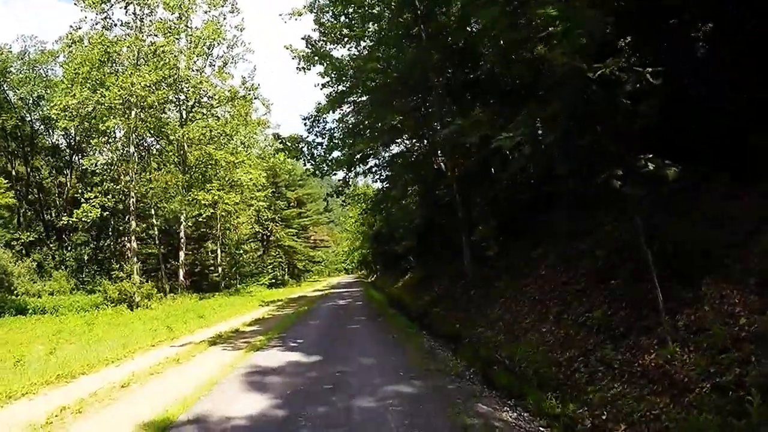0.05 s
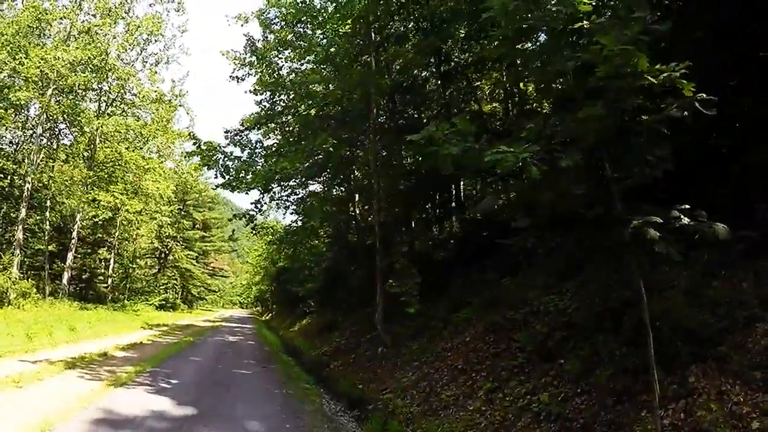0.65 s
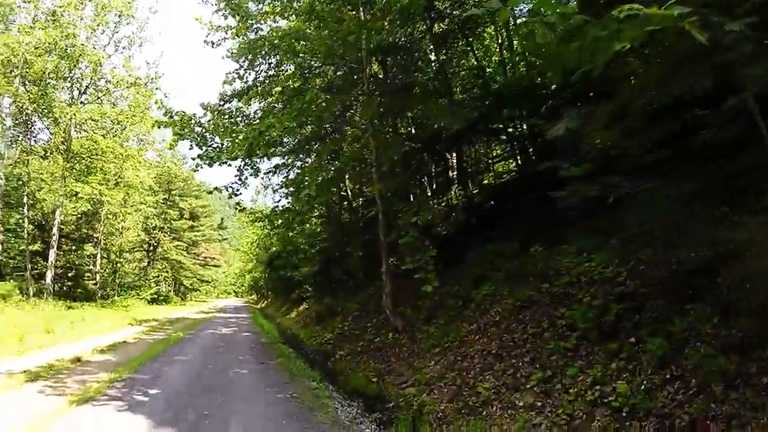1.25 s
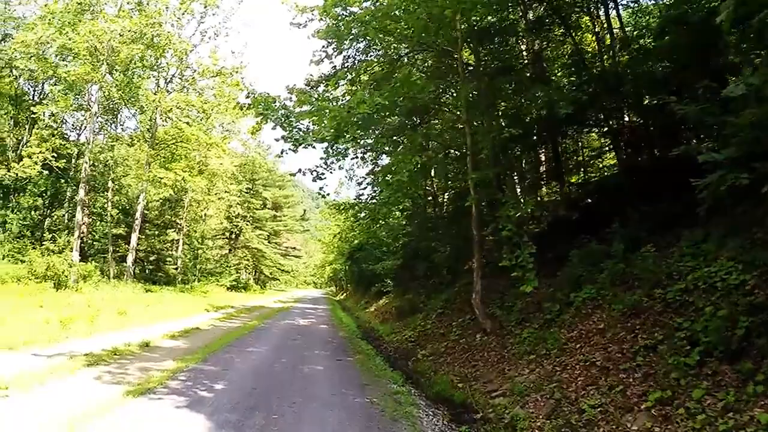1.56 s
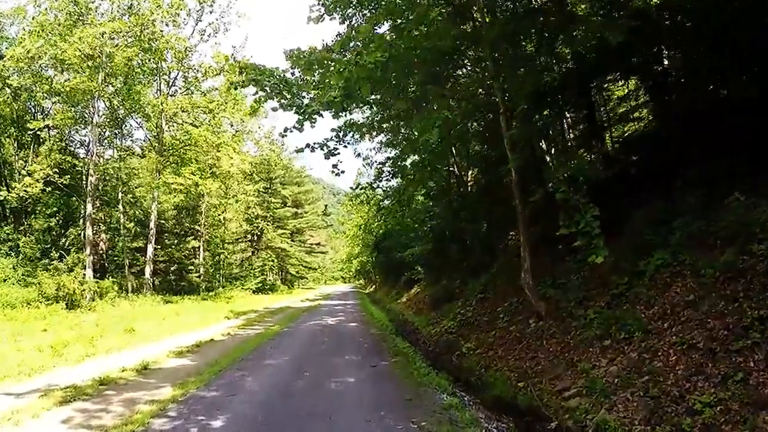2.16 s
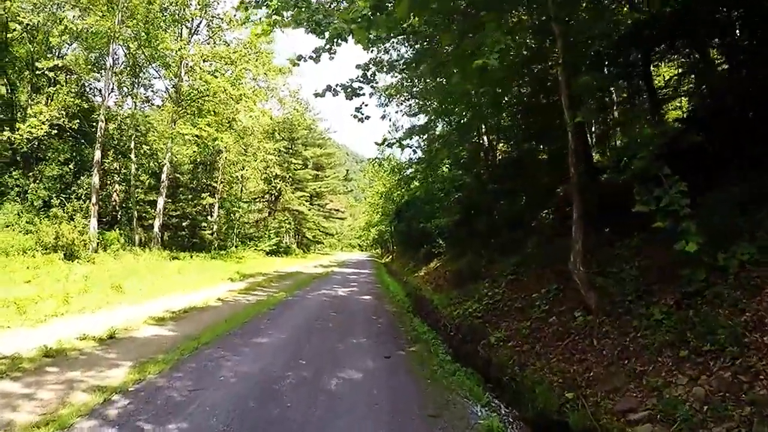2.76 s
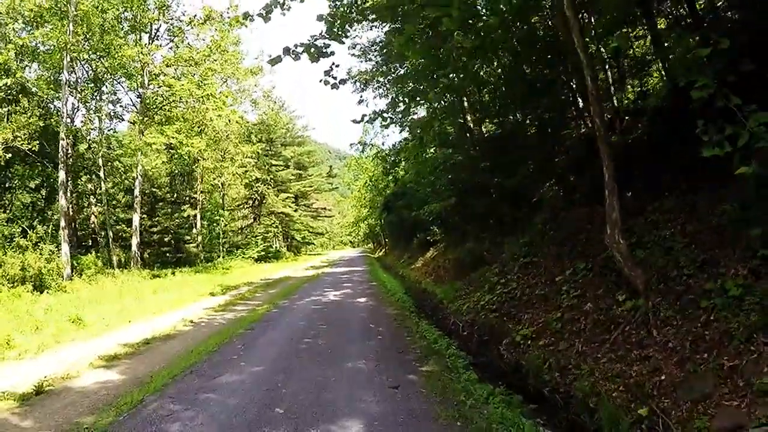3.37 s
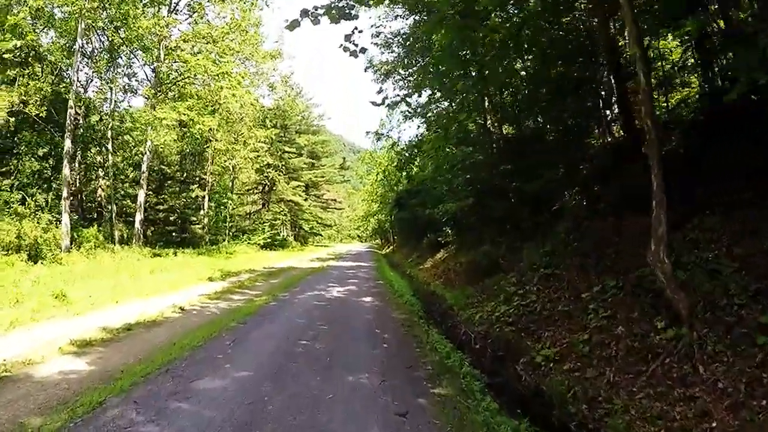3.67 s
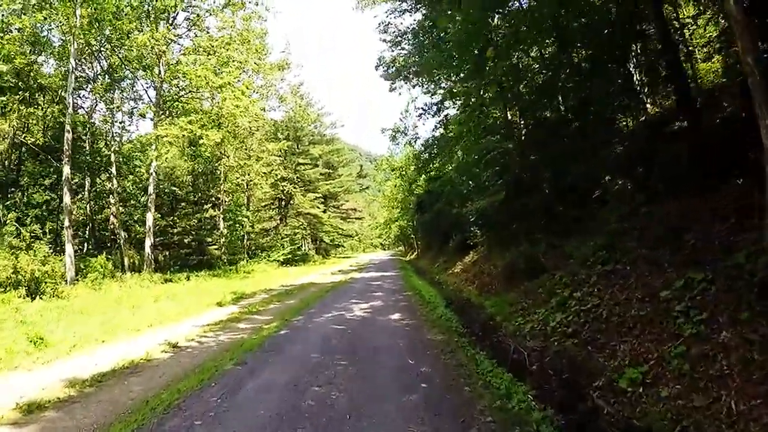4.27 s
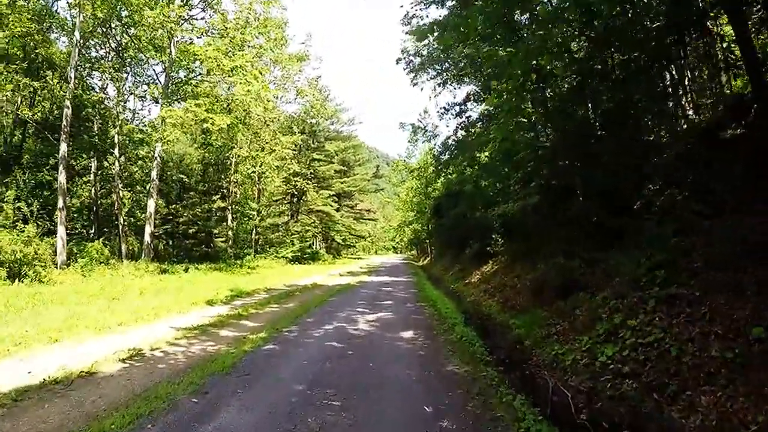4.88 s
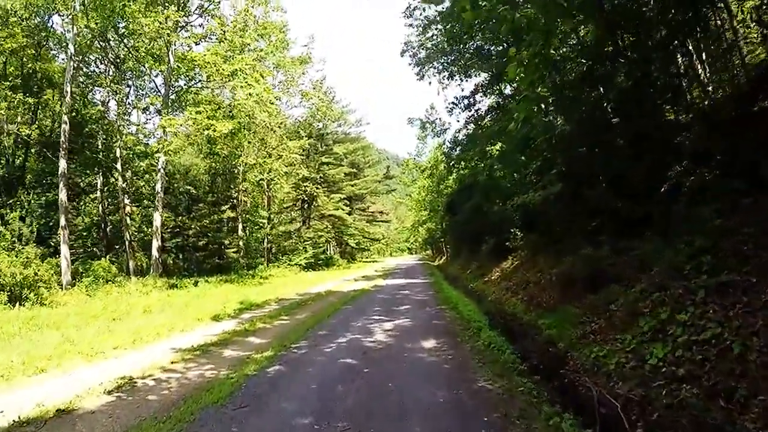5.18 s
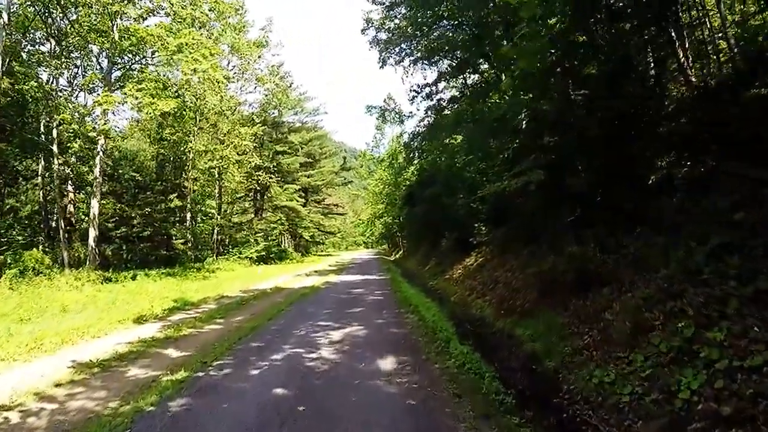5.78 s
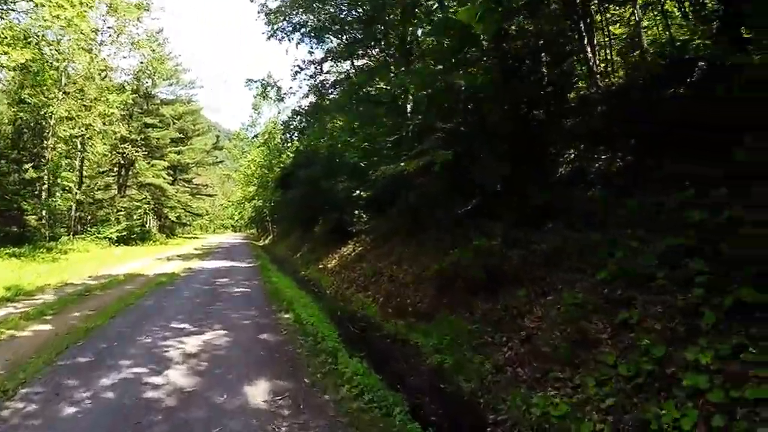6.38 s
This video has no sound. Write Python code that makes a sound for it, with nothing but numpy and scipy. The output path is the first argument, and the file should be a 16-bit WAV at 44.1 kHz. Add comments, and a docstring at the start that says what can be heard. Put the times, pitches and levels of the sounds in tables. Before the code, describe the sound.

Bicycle tyres crackle steadily over fine gravel, with sharp ticks of flicked stones and wind rumbling on the microphone.

```python
"""A bicycle rolls steadily along a fine gravel trail, heard from a camera in a plastic housing.
From the start the tyres crush grit into a crackle, the frame hums and the camera whines faintly.
Flicked stones ring the housing briefly, loudest at 0.6, 2.7 and 3.2 s, between gusts on the microphone.
Loosened gravel rattles now and then, most at 4.7 s. The strongest gusts follow at 5.1-5.5 s."""
import sys
import numpy as np
from scipy import signal
from scipy.fft import rfft, irfft, next_fast_len
from scipy.io import wavfile
from scipy.ndimage import uniform_filter1d, map_coordinates

SR = 44100
rng = np.random.default_rng(int(sys.argv[2]) if len(sys.argv) > 2 else 0)


def to_wav(sig):
    """Store sig (one row per channel, or 1-D mono) as 16-bit WAV at the path in sys.argv[1].

    Samples outside -1..1 are clipped; the rate is SR.
    """
    pcm = np.clip(np.atleast_2d(sig), -1, 1) * 32767
    pcm = np.round(pcm).astype(np.int16)
    wavfile.write(sys.argv[1], SR, pcm.T)  # frames by channels


N = 283563

# Table levels are relative; each source adds its own trim.
# tyre crunch: time_s, level_db
CRUNCH_LEVEL = [(0.0, -49), (0.66, -46.5), (1.2, -50), (1.83, -45), (2.29, -49.5), (2.52, -48),
                (4.48, -48.5), (4.96, -47), (5.77, -48), (6.43, -48)]
# grit, finest grains, rolling noise, plastic housing: freq_hz, gain_db
GRIT_SPECTRUM = [(300, -13.5), (800, -4), (1500, -11.5), (2000, -11), (2350, -5), (2650, 0), (3100, -3.5),
                 (3400, -9.5), (3920, -11), (4170, -6.5), (4450, -13.5), (5600, -7.5), (6800, -18.5),
                 (9000, -33.5)]
SAND_SPECTRUM = [(1000, -36), (3500, 5), (4200, -9.5), (4600, 3), (5100, 1.5), (6200, -8), (7500, -7.5),
                 (9000, -8), (14000, -29)]
ROLL_SPECTRUM = [(120, 13.5), (280, -10), (600, 3), (780, -9), (1050, -0.5), (1450, -17.5), (2200, -32),
                 (5000, -64)]
HOUSING_SPECTRUM = [(100, -33.5), (380, -9), (560, -0.5), (820, -2), (1200, -3), (1600, -8.5), (2100, -6.5),
                    (2600, 2.5), (3150, -1), (3800, -8), (4300, -1.5), (5700, -1.5), (7000, -8),
                    (9000, -23), (11500, -23), (15000, -39)]
# bicycle resonances: centre_hz, width_hz, gain_db
FRAME_MODES = [(378.8, 5.6, 4.5), (525.3, 13.3, 1), (669, 71, -3), (825, 18, -9)]
# loudest flicked stones: start_s, level_db, pitch_hz
LOUD_STONES = [(.194, -27, 1770), (.222, -24, 3140), (.597, -17.5, 3780), (1.211, -24, 3950),
               (1.3865, -31, 1270), (1.605, -27.5, 3000), (1.613, -22.5, 2920), (1.861, -28.5, 3050),
               (2.135, -29, 2340), (2.476, -23, 2000), (2.636, -27, 2080), (2.6955, -26.5, 1750),
               (2.7225, -18, 3600), (2.947, -30, 2390), (3.099, -29, 2940), (3.1764, -14, 2700),
               (3.180, -17, 1870), (3.239, -26, 3440), (3.2984, -26, 3830), (3.347, -28, 3200),
               (3.9377, -20.5, 2100), (4.551, -26.5, 3740), (4.734, -22.5, 2420), (4.7404, -25, 1250),
               (4.886, -26.5, 1000), (5.014, -30, 2910), (5.286, -26, 2950), (5.435, -24, 3300),
               (5.8646, -27.5, 3020), (5.998, -30.5, 1030), (6.302, -25, 2980), (6.416, -26, 4100)]
# loosened gravel: start_s, level_db, pitch_hz, t60_s
RATTLES = [(.664, -37, 2520, .039), (1.606, -43, 2710, 0.14), (1.915, -45, 3000, 0.21),
           (2.671, -41, 1780, 0.34), (3.425, -37, 900, 0.12), (3.644, -36.5, 1070, .06),
           (4.736, -32, 670, 0.12), (4.745, -38.5, 2700, 0.2), (4.967, -39.5, 2500, 0.17)]
# large and small wind eddies: time_s, level_db
BUFFET_LEVEL = [(0.0, -29.5), (0.83, -31), (0.85, -35.5), (1.25, -30), (1.32, -21.5), (1.55, -36.5),
                (2.1, -21), (2.21, -31), (2.24, -24.5), (2.76, -33.5), (3.16, -23), (3.21, -28.5),
                (3.87, -33), (4.28, -22.5), (4.64, -29.5), (5.02, -29), (5.14, -18), (5.32, -17),
                (5.44, -26), (5.49, -15.5), (5.61, -23), (5.89, -23.5), (5.91, -27.5), (6.24, -28.5)]
FLUTTER_LEVEL = [(0.0, -42), (0.11, -47), (0.48, -38.5), (1.79, -46), (1.88, -43.5), (3.49, -46),
                 (3.74, -37), (3.89, -47), (4.21, -44.5), (4.91, -48), (5.1, -35), (5.12, -44),
                 (5.28, -32.5), (5.35, -43.5), (5.55, -39.5), (5.62, -44.5), (6.3, -41.5), (6.43, -31)]
# large and small wind eddies: freq_hz, gain_db
BUFFET_SPECTRUM = [(10, -28), (22, -5.5), (35, -0.5), (65, -5), (100, -12), (150, -23.5), (300, -39.5),
                   (700, -117)]
FLUTTER_SPECTRUM = [(50, -24), (100, -4.5), (150, -1), (230, -6), (370, -11), (600, -17), (1500, -53)]

STONE_HZ = 3040  # typical pitch


def tyres():
    """Grit hisses, gravel crackles, rolling shakes the bicycle; loose patches stir gravel most."""
    crunch_db = envelope(CRUNCH_LEVEL)
    patch_db = 0.7 * wobble(20)
    grit = grains(GRIT_SPECTRUM, count=24000, pitch_hz=4460, log_spread=0.48, scatter_db=1.5, cycles=0.3)
    gravel = grains(HOUSING_SPECTRUM, count=1800, pitch_hz=2940, log_spread=0.54, scatter_db=8,
                    cycles=0.84)
    sand = grains(SAND_SPECTRUM, count=1800, pitch_hz=5040, log_spread=0.24, scatter_db=0.5, cycles=2)
    crunch = amp(-0.3 + patch_db) * grit + amp(-5 + 4.6 * patch_db) * gravel
    crunch += amp(-12 + 2.8 * wobble(35)) * sand
    roll_db = -46.6 + 0.23 * (crunch_db - crunch_db.mean())
    rolling = amp(-4) * frame_hum()
    rolling += amp(1.66 + patch_db + 2.2 * wobble(14)) * noise(ROLL_SPECTRUM)
    return amp(crunch_db) * crunch + amp(roll_db) * rolling


def grains(spectrum, count, pitch_hz, log_spread, scatter_db, cycles):
    """Contacts of random time, pitch and size ring a body with this spectrum; rms 1."""
    starts = rng.integers(0, N, count)
    pitch_draw, size_draw = rng.standard_normal((2, count))
    snaps = snap(np.minimum(pitch_hz * np.exp(log_spread * pitch_draw), SR / 4), cycles)
    snaps /= np.linalg.norm(snaps, axis=1, keepdims=True)
    sizes = amp(scatter_db * np.minimum(size_draw, 2.2)) * rng.choice([-1, 1], count)
    indices = starts[:, None] + np.arange(snaps.shape[1])
    contacts = np.bincount(indices.ravel(), (snaps * sizes[:, None]).ravel(), N)[:N]
    return unit(signal.fftconvolve(contacts, impulse_response(spectrum))[:N])


def stones():
    """Each stone snaps, scrapes and rebounds, ringing the housing; small, high ones crack harder."""
    out, housing = np.zeros(N + SR), impulse_response(HOUSING_SPECTRUM)
    t = np.arange(len(housing)) / SR
    for start_s, level_db, pitch_hz in list(LOUD_STONES) + pebbles(count=16):
        cycles = 0.7 * max(pitch_hz / STONE_HZ, 0.8) ** 1.4
        crack_db = -4.5 + 16 * np.log2(pitch_hz / STONE_HZ)
        rebound_s = 0.000735 * np.exp(0.13 * rng.standard_normal())
        strike = snap(pitch_hz, cycles, size=len(t))[0]
        scrape = amp(-15 - 60 * t / 0.036) * rng.standard_normal(len(t))
        contact = soften(strike + scrape, cutoff_hz=1.56 * pitch_hz)
        contact += amp(crack_db) * signal.unit_impulse(len(t), 6)  # stone on stone
        contact -= 0.38 * np.interp(t - rebound_s, t, contact, left=0)
        tick = signal.fftconvolve(contact, housing)
        out[round(start_s * SR):][:len(tick)] += amp(level_db + 1.7) * tick / np.abs(tick).max()
    return out[:N]


def pebbles(count):
    """Lesser stones at random moments: start_s, level_db, pitch_hz."""
    level_draw, pitch_draw = rng.standard_normal((count, 2)).T
    level_db = -31.5 + 3 * level_draw
    pitch_hz = np.clip(STONE_HZ * 2 ** (0.61 * pitch_draw), 1000, 4200)
    return list(zip(rng.uniform(0, N / SR, count), level_db, pitch_hz))


def loose_gravel(contacts_per_s=1400):
    """Loosened stones rattle and settle in quickly fading clusters."""
    out, housing = np.zeros(N + SR), impulse_response(HOUSING_SPECTRUM)
    t = np.arange(SR // 4) / SR
    for start_s, level_db, pitch_hz, t60_s in RATTLES:
        contacts = rng.standard_normal(len(t)) * (rng.random(len(t)) < contacts_per_s / SR)
        strike = soften(snap(pitch_hz, cycles=0.5)[0], cutoff_hz=3200)
        knock = np.convolve(strike, housing)
        rattle = unit(signal.fftconvolve(contacts, knock)[:len(t)])
        out[round(start_s * SR):][:len(t)] += amp(level_db - 60 * t / t60_s) * rattle
    return out[:N]


def wind():
    """Large eddies thump the microphone; small ones flutter in the upper bass."""
    buffet = amp(envelope(BUFFET_LEVEL) + 0.5) * eddies(BUFFET_SPECTRUM, span_s=0.112, evenness=0.77)
    flutter = amp(envelope(FLUTTER_LEVEL) + 1) * eddies(FLUTTER_SPECTRUM, span_s=0.11, evenness=0.52)
    return buffet + flutter


def eddies(spectrum, span_s, evenness):
    """Turbulence of fairly even strength; rms 1."""
    turbulence = noise(spectrum)
    power = np.abs(uniform_filter1d(turbulence ** 2, int(span_s * SR)))
    return unit(turbulence / np.sqrt(power + 1e-6) ** evenness)


def frame_hum():
    """Random vibration drives the bicycle's resonances; rms 1."""
    def response(hz):
        return sum(amp(gain_db) * 1j * hz * width_hz / (centre_hz ** 2 - hz ** 2 + 1j * hz * width_hz)
                   for centre_hz, width_hz, gain_db in FRAME_MODES)
    return unit(filtered(rng.standard_normal(N), response))


def camera_whine(pitch_hz=12409):
    """A thin tone with unsteady phase."""
    jitter_rad = 0.8 * wobble(30) + 0.55 * wobble(260)
    return amp(-75) * np.sin(2 * np.pi * pitch_hz * np.arange(N) / SR + jitter_rad)


def snap(pitch_hz, cycles, size=256):
    """Damped sines, one row per contact, down to 1/e after `cycles`."""
    turns = np.outer(pitch_hz, np.arange(size) / SR)
    return np.sin(2 * np.pi * turns) * np.exp(-turns / cycles)


def soften(x, cutoff_hz):
    """Low-pass: a longer contact holds less treble."""
    return signal.sosfilt(signal.butter(6, min(cutoff_hz, SR / 3), fs=SR, output="sos"), x)


def impulse_response(spectrum, size=1024):
    """Minimum-phase ring of a body with this spectrum."""
    cepstrum = irfft(np.log(gain(spectrum, np.fft.rfftfreq(size, 1 / SR)) + 1e-6))
    cepstrum[1:size // 2] *= 2
    cepstrum[size // 2 + 1:] = 0
    return irfft(np.exp(rfft(cepstrum)))


def noise(spectrum):
    """Coloured noise; rms 1."""
    return unit(filtered(rng.standard_normal(N), lambda hz: gain(spectrum, hz)))


def filtered(x, response):
    """x through a frequency response."""
    size = next_fast_len(N + SR // 2)
    return irfft(rfft(x, size) * response(np.fft.rfftfreq(size, 1 / SR)), size)[:N]


def gain(spectrum, hz):
    """Spectrum joined on a log axis; falls 24 dB/octave above its last point."""
    freq_hz, gain_db = np.transpose(spectrum)
    rolloff = np.maximum(hz / freq_hz[-1], 1) ** 4
    return amp(np.interp(np.log(hz + 1), np.log(freq_hz), gain_db)) / rolloff


def envelope(rows):
    """level_db at every sample."""
    time_s, level_db = np.transpose(rows)
    return np.interp(np.arange(N) / SR, time_s, level_db)


def wobble(rate_hz):
    """Smooth curve through random knots."""
    knots = rng.standard_normal(int(N * rate_hz / SR) + 4)
    return map_coordinates(knots, [np.arange(N) * rate_hz / SR])


def amp(db):
    """Decibels to gain."""
    return 10 ** (np.asarray(db) / 20)


def unit(x):
    """x at rms 1."""
    return x / np.sqrt(np.mean(x ** 2) + 1e-20)


def scene():
    """Tyres, stones, loose gravel and wind; mono."""
    return (tyres() + stones() + loose_gravel() + wind())[None]


def record(dry):
    """The camera adds hiss and whine, then limits the band."""
    top_hz = 15400
    hiss = amp(-70.5) * rng.standard_normal(N)
    return filtered(dry[0] + hiss + camera_whine(), lambda hz: hz < top_hz)[None]


dry = scene()
out = record(dry)
to_wav(out)
```